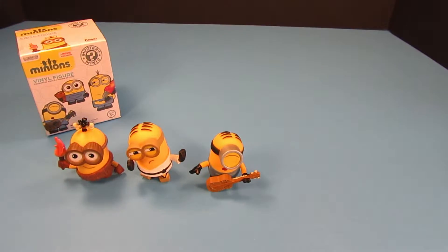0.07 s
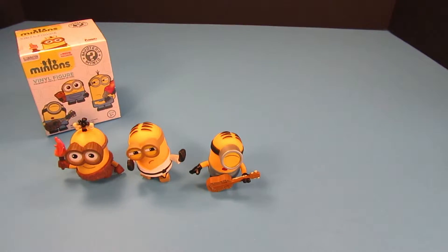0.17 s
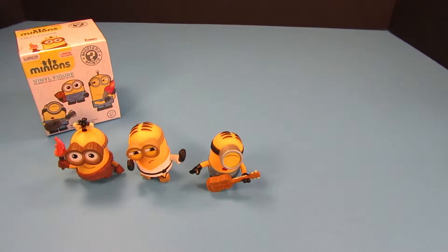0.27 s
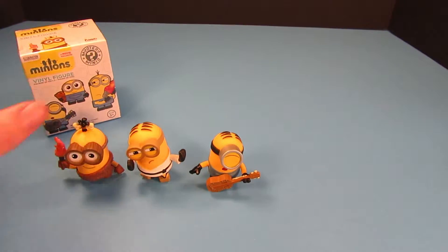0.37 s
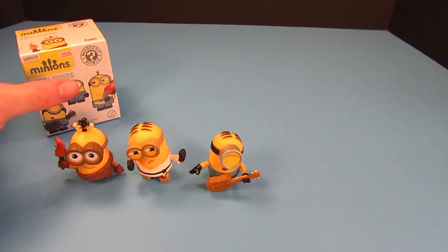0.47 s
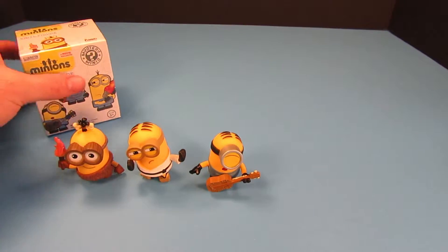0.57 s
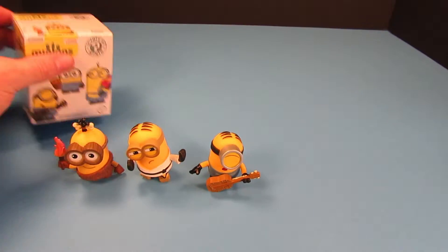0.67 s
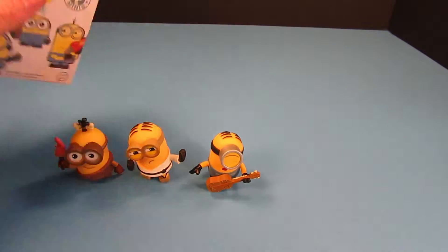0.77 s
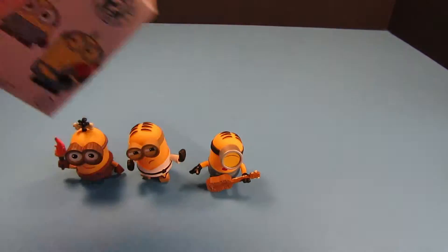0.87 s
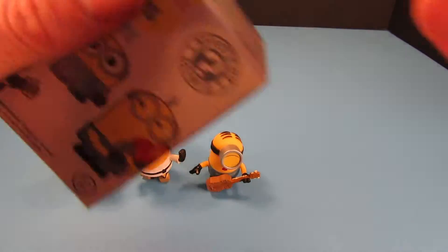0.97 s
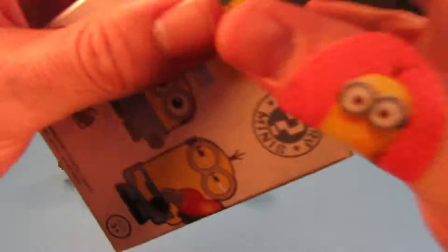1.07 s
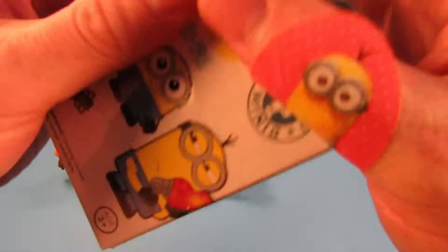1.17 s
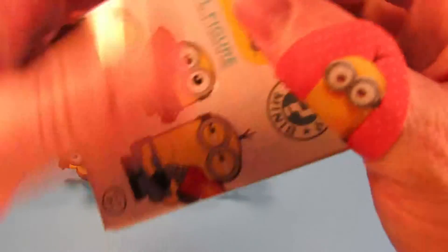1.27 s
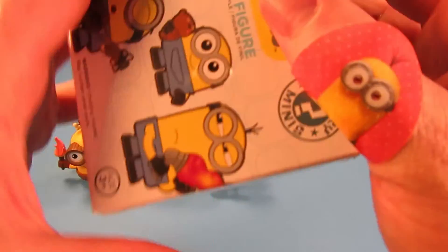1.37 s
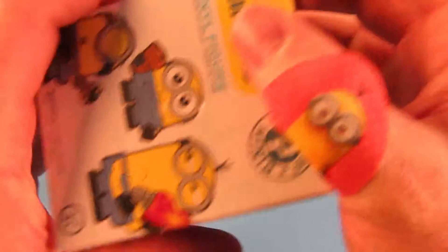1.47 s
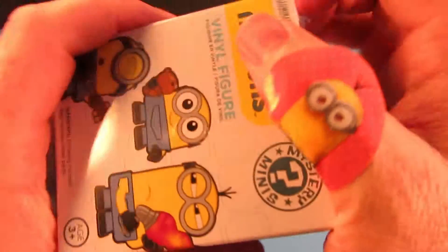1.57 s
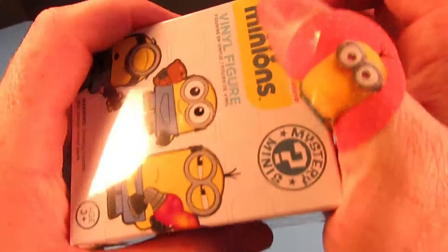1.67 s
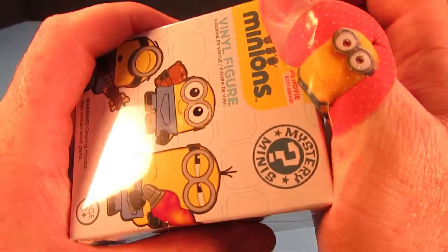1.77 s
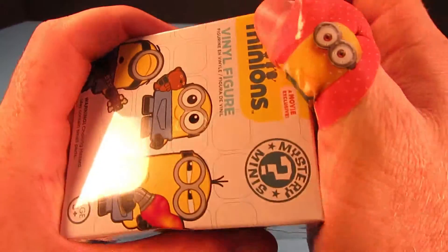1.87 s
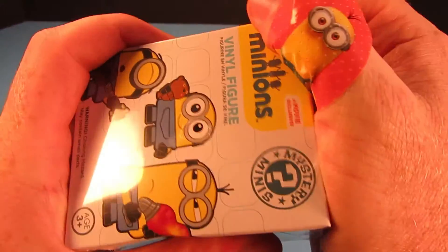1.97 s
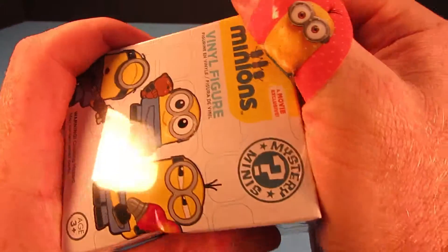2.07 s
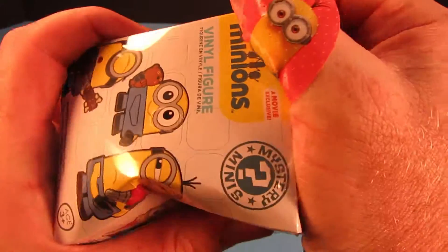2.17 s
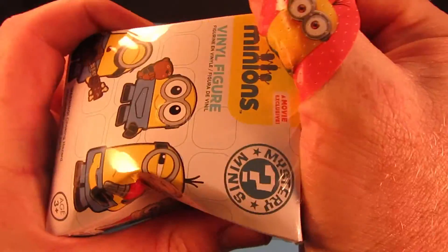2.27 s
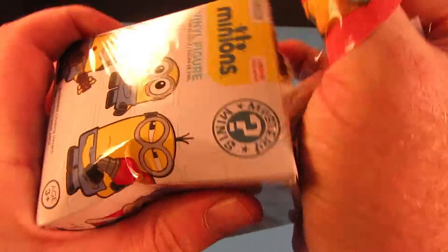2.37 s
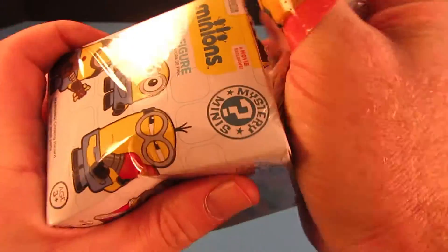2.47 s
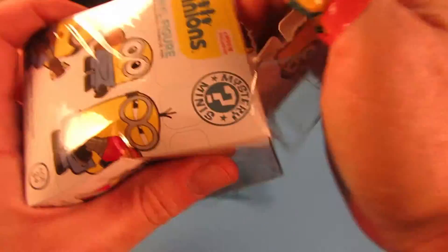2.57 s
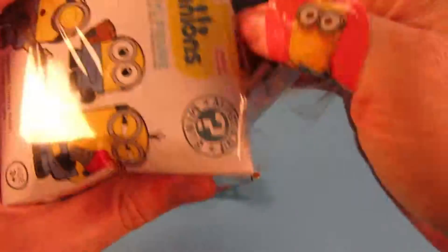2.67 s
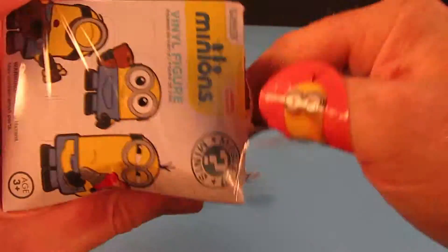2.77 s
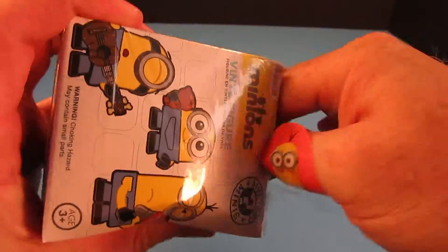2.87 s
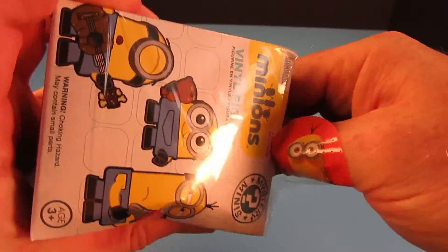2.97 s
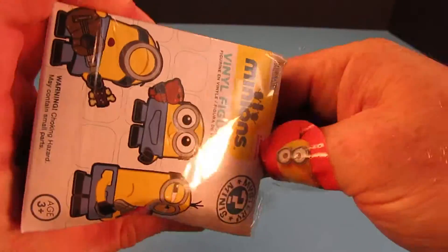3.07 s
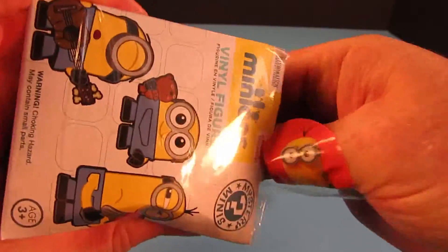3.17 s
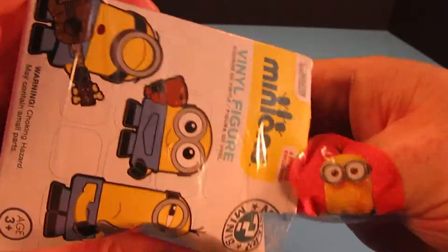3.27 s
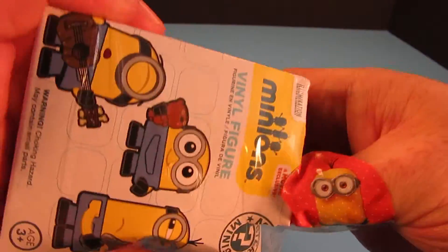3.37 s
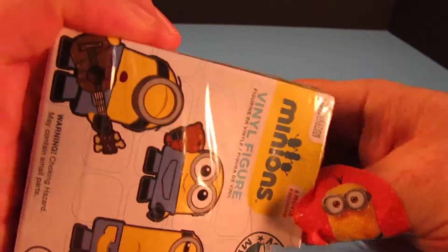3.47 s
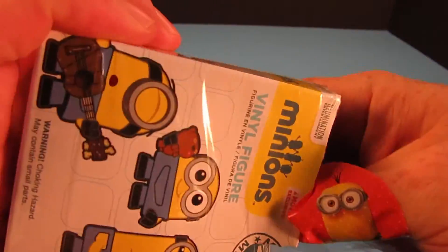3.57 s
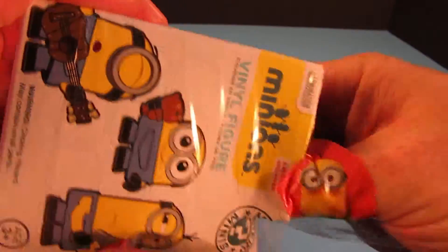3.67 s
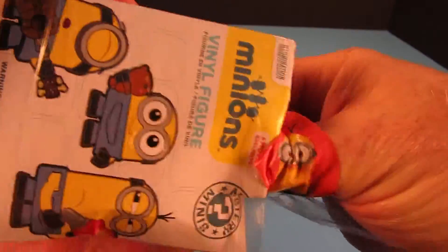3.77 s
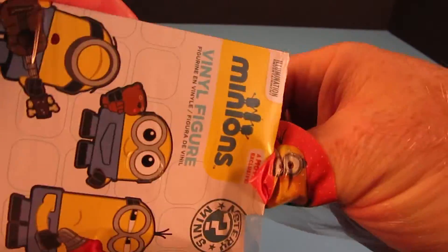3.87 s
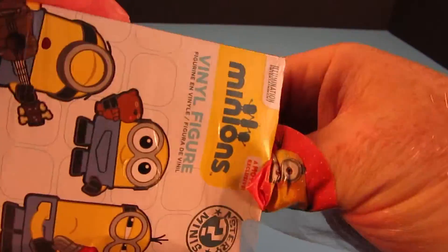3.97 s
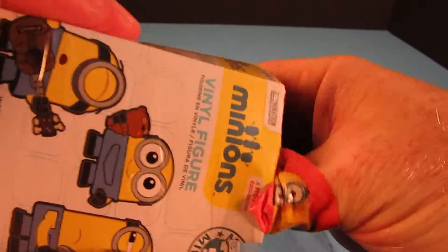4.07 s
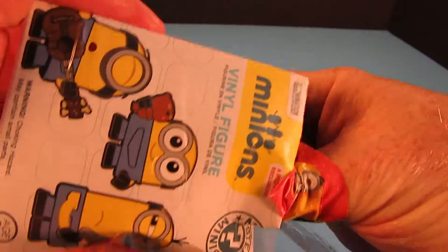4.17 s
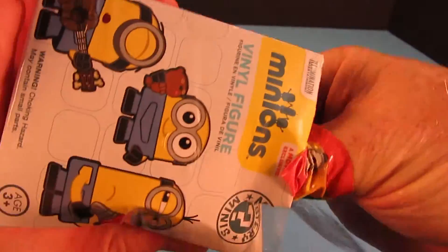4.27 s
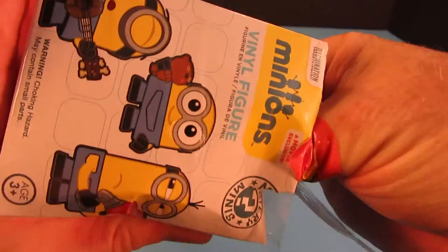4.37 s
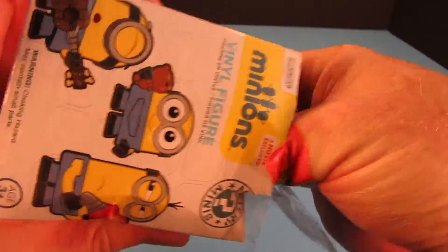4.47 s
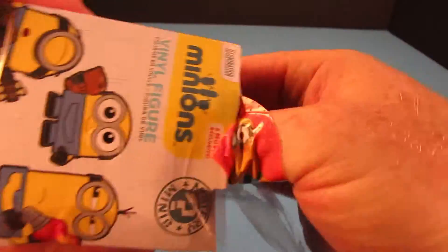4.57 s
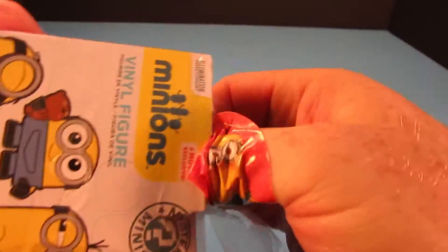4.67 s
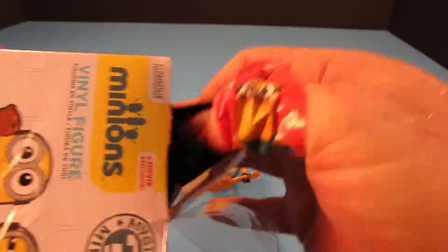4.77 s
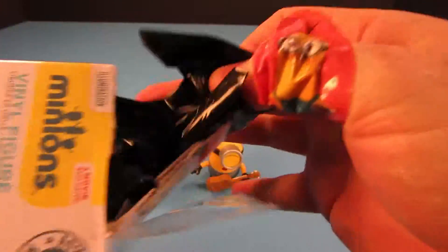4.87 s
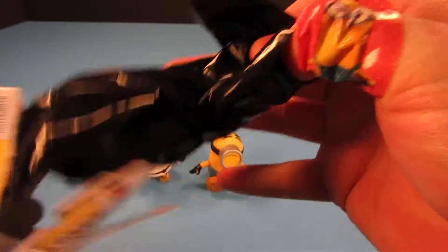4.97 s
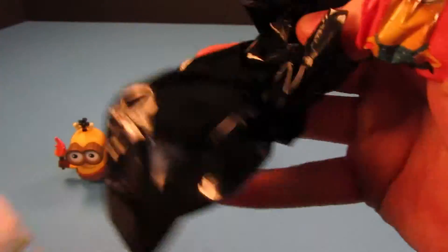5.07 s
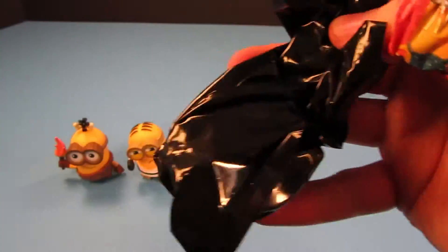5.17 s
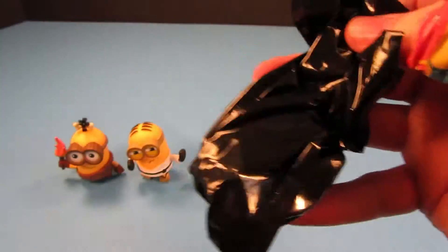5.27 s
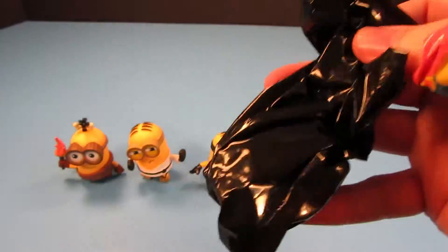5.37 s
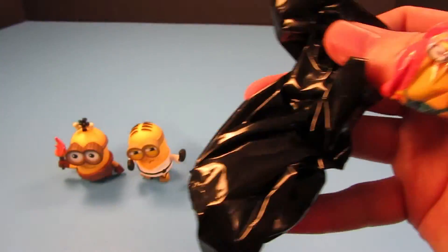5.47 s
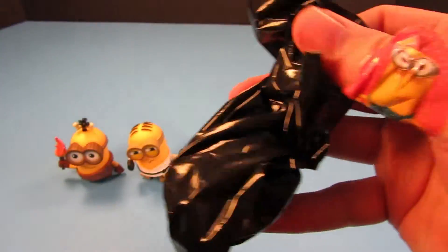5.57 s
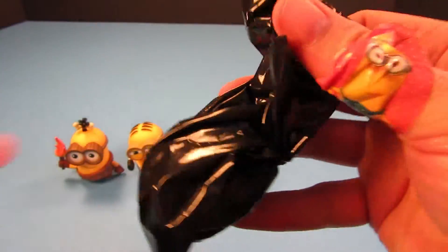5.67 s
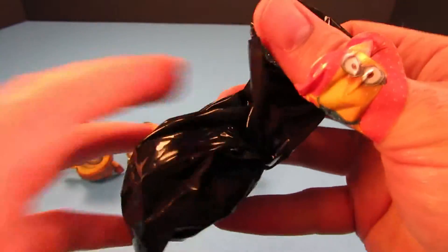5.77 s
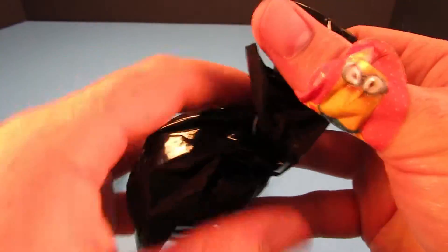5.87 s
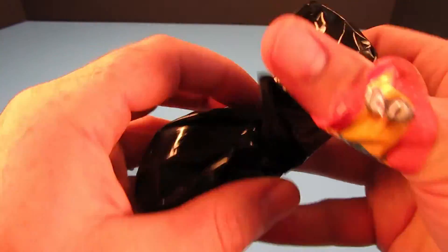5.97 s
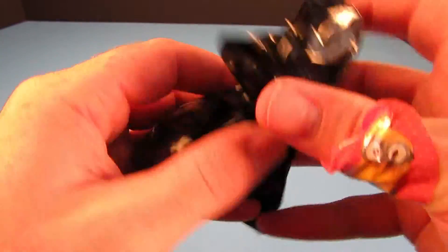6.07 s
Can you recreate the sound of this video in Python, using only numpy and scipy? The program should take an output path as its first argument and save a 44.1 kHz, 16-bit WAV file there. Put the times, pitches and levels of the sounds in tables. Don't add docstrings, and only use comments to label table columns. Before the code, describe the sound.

Faint hiss, then soft taps and a hollow knock from a light cardboard box. Film wrap is torn with bright cracks, a short creak and loud snaps, the box walls flexing under the fingers. A rush of foil rustle follows as a bag is drawn out, then sparse ticks, a clattering box landing, and a renewed burst of crisp crinkles. Very close, dry, with a short dull room tail.

```python
import sys
import numpy as np
from scipy import signal
from scipy.fft import rfft, irfft
from scipy.io import wavfile
from scipy.ndimage import uniform_filter1d

SR = 44100
rng = np.random.default_rng(int(sys.argv[2]) if len(sys.argv) > 2 else 0)


def generate_wav(signal):
    frames = np.transpose(np.atleast_2d(signal))
    scaled = np.clip(frames, -1, 1) * 32767
    pcm = np.round(scaled).astype(np.int16)
    wavfile.write(sys.argv[1], SR, pcm)


def magnitude_from_level(level_db):
    exponent = np.asarray(level_db, float) / 20
    return 10 ** exponent


N = 269892
TIME_S = np.arange(N) / SR
FACE_HZ = 710

# f/Hz, density/dB
HISS_SPECTRUM = [(25, -2.5), (230, -2.5), (710, -1), (1460, -10), (8600, -21), (9700, -17), (10800, -23.5),
                 (15000, -30)]
# t/s, level/dB
HISS_LEVEL = [
    (0, -53),
    (.9, -49),
    (1.4, -53.5),
    (2.1, -46.5),
    (2.8, -89.5),
    (6.12, -58),
]
# f/Hz, t60/s, level/dB
BOX_MODES = [(345, 0.013, 3.5), (470, 0.052, 3), (750, 0.046, 10), (874, 0.018, 7), (1080, 0.016, 14.5),
             (1700, 0.035, 3)]
# f/Hz, density/dB
FILM_SPECTRUM = [(700, -17.5), (1300, 11.5), (2600, 10.5), (5000, 3), (8000, -4), (11000, -7), (15000, -16)]
# t/s, effort/dB
EFFORT = [(.6, -108), (1.0, -46.5), (1.14, -64), (1.27, -47), (1.34, -76), (1.44, -63), (1.6, -62),
          (2.0, -55), (2.17, -59.5), (2.34, -50), (2.77, -56.5), (3.03, -53.5), (3.2, -65.5), (4.75, -41),
          (4.86, -34.5), (5.03, -31), (5.13, -54.5), (5.25, -60.5), (5.85, -68.5), (6.12, -38)]
# centre t/s, width/s, level/dB, box coupling/dB
RIPS = [(1.304, 0.044, -46.5, 15.5), (1.488, 0.038, -37, 14.5), (1.57, 0.045, -41, 6),
        (1.653, 0.061, -30.5, 11), (1.693, 0.022, -31.5, 13.5), (1.929, 0.039, -33, 11.5),
        (2.022, 0.081, -31.5, 8.5), (2.402, 0.021, -21, -18), (2.425, 0.063, -19.5, 7.5),
        (2.553, 0.022, -43.5, -16), (2.674, 0.027, -30.5, 3), (2.83, 0.047, -44, 4.5),
        (2.991, 0.093, -34, 7), (3.118, 0.047, -34, 8.5), (3.259, 0.15, -36, 6), (3.315, 0.058, -17.5, 1.5),
        (3.441, 0.1, -40.5, 10), (3.499, 0.042, -40, 3.5), (3.616, 0.039, -42, -9),
        (4.063, 0.033, -33.5, 5.5), (4.116, 0.058, -41, 3), (4.169, 0.026, -31, 11.5),
        (4.252, 0.073, -38, 4.5), (4.474, 0.02, -29.5, -6), (5.053, 0.051, -30.5, 7.5),
        (5.935, 0.068, -42.5, 10.5)]
# centre t/s, width/s, level/dB, box coupling/dB
DRAGS = [(0.926, 0.039, -43.5, 10.5), (1.036, 0.014, -34, 28.5), (1.189, 0.014, -41.5, -3),
         (1.223, 0.029, -56, 31), (1.887, 0.059, -33.5, 7.5), (2.221, 0.027, -24.5, 9),
         (2.257, 0.031, -23, -5), (2.586, 0.031, -43.5, 1), (2.712, 0.031, -38, 10), (2.908, 0.061, -30, 3),
         (3.682, 0.031, -34, 2.5), (3.759, 0.092, -40, 2), (3.835, 0.067, -33, -5),
         (3.965, 0.047, -31, -15), (4.323, 0.032, -31, 3.5), (4.441, 0.036, -27.5, -10),
         (4.624, 0.11, -40, -7), (4.686, 0.0046, -37, -6), (5.21, 0.014, -44, 3)]
# centre t/s, width/s, level/dB
HALTS = [(1.627, 0.018, -7.5), (1.873, 0.019, -6), (2.418, 0.008, -6), (3.196, 0.034, -3),
         (3.288, 0.028, -1.5), (3.364, 0.064, -5), (3.694, 0.015, -2), (3.866, 0.018, -4),
         (3.968, 0.011, -15), (4.017, 0.028, -6), (4.057, 0.012, -3), (4.342, 0.01, -8),
         (4.524, 0.022, -6.5), (4.726, 0.013, -23), (5.367, 0.032, -9), (5.985, 0.013, -11)]
# t/s, rms level/dB, t60/s
LANDING = [
    (5.7427, -27, 0.1),
    (5.7545, -17.5, 0.19),
]
# t/s, edge click level/dB, panel level/dB
SLIPS = [
    (2.0717, 7, 0.5),
    (2.0865, -26, -12),
    (2.1013, -32, -11),
    (2.113, -21, -7.5),
    (2.1259, -13, -6),
]
# t/s, peak level/dB, f/Hz
KNOCKS = [(0.7085, -24.5, 1400), (0.7174, -26, 620), (0.7245, -28, 310), (0.7945, -29.5, 557),
          (1.0335, -4.5, 835), (1.6395, -28, 1020), (1.6808, -15.5, 235), (1.9182, -20, 1080),
          (1.9401, -26.5, 540), (2.3008, -25.5, 594), (2.4128, -9.5, 362), (2.4268, -8, 990),
          (2.6934, -27, 470), (2.9901, -17.5, 540), (3.3112, -11, 1150), (3.5194, -2.8, 830),
          (3.5804, -20, 390), (3.8261, -21.5, 340), (3.9551, -15.5, 448), (4.8168, -8.5, 440),
          (4.857, -21, 255), (5.0128, -18, 1160)]
# t/s, peak level/dB
TAPS = [(0.7083, -21), (0.8031, -25), (1.111, -27.5), (1.1861, -22), (1.2318, -22), (1.476, -22),
        (1.5011, -18.5), (1.7626, -27.5), (2.2108, -15), (2.2519, -11), (2.6777, -23.5), (2.9469, -19.5),
        (3.2906, -3.5), (3.3264, -8), (3.3677, -10), (3.4329, -28.5), (3.7568, -21.5), (4.0635, -26),
        (4.1653, -20.5), (4.2745, -7.5), (4.2935, -24), (4.4768, -22), (5.052, -31), (5.0629, -37),
        (5.085, -33), (5.7612, -7), (6.087, -24)]
# t/s, peak level/dB, f/Hz, t60/s
THUDS = [(0.712, -26.5, 112, 0.24), (0.919, -30, 120, 0.016), (1.0316, -9, 488, 0.032),
         (3.522, -12.5, 404, 0.0067), (4.164, -24.5, 184, 0.02), (4.2759, -9, 333, 0.029),
         (4.817, -14, 299, 0.029), (1.6693, -13.5, 238, 0.067), (1.679, -18.5, 1834, 0.06)]
# t/s, peak level/dB, f/Hz
FLEXES = [(0.8816, -37, 597), (0.745, -34.5, 700), (1.054, -23, 467), (1.2177, -41, 800), (1.048, -30, 900),
          (1.451, -33.5, 730), (1.4851, -27, 664), (1.6056, -36, 304), (1.6097, -35, 710),
          (1.6518, -19.5, 710), (1.8678, -31, 1060), (1.8909, -30, 710), (1.9183, -26.5, 270),
          (1.946, -28.5, 266), (1.9461, -27, 710), (2.0465, -28, 187), (2.2113, -26, 300),
          (2.2531, -32, 308), (2.4456, -18, 308), (2.4487, -34, 286), (2.8757, -33, 450),
          (2.9074, -26, 570), (3.0088, -29, 710), (3.3909, -27.5, 425), (4.298, -27, 420),
          (3.5205, -13, 1230), (3.5205, -7.5, 374), (3.8152, -30, 830), (4.092, -34, 710),
          (4.1122, -38, 403), (4.294, -23.5, 1300), (4.274, -15.5, 1020), (4.63, -29, 756),
          (4.6503, -33, 700), (4.6536, -43, 524), (4.678, -27, 750), (4.7006, -29, 1070),
          (4.7354, -30, 740), (4.7968, -26, 590), (4.8446, -27, 460), (4.8741, -28, 750),
          (4.8865, -25.5, 744), (4.9126, -27.5, 730), (4.9267, -38, 750), (4.861, -21.5, 775),
          (4.9676, -29, 780), (5.0408, -25, 700), (5.051, -9.5, 750), (5.0629, -23, 750),
          (5.0854, -21.5, 790), (5.1245, -29, 720), (5.8741, -36, 360)]
# t/s, peak level/dB, f/Hz
NUDGES = [(0.9929, -34, 580), (1.0056, -36, 646), (1.941, -27, 640), (3.5683, -35, 480), (3.6839, -43, 710),
          (3.7471, -47, 680), (3.9243, -36, 1070), (4.5827, -36, 750), (4.6014, -39, 680)]
# t/s, peak level/dB, f/Hz
FACETS = [(0.9644, -33, 2600), (1.218, -31, 1343), (1.2952, -20, 4200), (1.6474, -25, 3220),
          (1.7005, -26, 1900), (1.8956, -32, 1290), (2.0125, -22.5, 2340), (2.0137, -26, 3230),
          (3.0085, -28, 2780), (2.1138, -26, 3240), (2.2241, -28, 2610), (0.69, -40, 3200),
          (2.2519, -11.5, 2556), (2.3001, -21, 1380), (2.4231, -12, 1450), (2.4258, -18, 3410),
          (2.9787, -23.5, 3060), (3.3109, -12, 3800), (3.3161, -22, 4700), (3.325, -9, 1980),
          (3.333, -13, 1280), (3.4462, -22.5, 1970), (3.8474, -24, 3150), (4.1883, -29, 1310),
          (4.2421, -29, 1800), (4.2449, -23.5, 4220), (4.3191, -22, 4260), (4.4272, -31, 3150),
          (4.4339, -27, 2220), (4.4428, -22, 2830), (4.4676, -20.5, 2020), (4.6129, -28, 2010),
          (4.6205, -25, 1980), (4.6521, -26, 2200), (4.6717, -29, 2270), (4.7069, -24.5, 3210),
          (4.7523, -27, 2030), (4.7672, -23.5, 3260), (3.8135, -31, 2210), (4.83, -29, 2510),
          (4.8307, -12, 4270), (4.8556, -22, 1490), (4.901, -24, 4460), (4.9246, -31, 2240),
          (4.9409, -28, 2460), (4.9516, -22, 4470), (4.9775, -20, 4310), (4.9884, -14, 4690),
          (5.0162, -19, 3600), (5.041, -14, 3880), (5.0638, -22, 4260), (5.0654, -28, 1580),
          (5.0913, -24, 4810), (5.7455, -26.5, 2380), (5.7852, -25, 1303), (6.0867, -18.5, 2340)]
# t/s, peak level/dB, centre f/Hz
CRINKLES = [(1.8947, -26, 6800), (2.4023, -4, 6160), (2.9908, -28, 6700), (3.2634, -26.5, 8300),
            (3.2937, -23, 5500), (3.3482, -26, 6140), (3.4287, -25, 5480), (3.4965, -24, 7240),
            (4.056, -29, 6960), (4.1839, -27, 5700), (4.4275, -22, 5870), (4.4429, -18.5, 6560),
            (4.5322, -25.5, 5470), (4.7066, -25, 8100), (4.8545, -26, 8840), (4.9354, -27, 7220),
            (4.9398, -18, 5620), (4.9775, -26, 6080), (5.0096, -24.5, 5730), (5.0142, -20, 9900),
            (5.0329, -20, 7300), (5.0404, -20.5, 5930), (5.0638, -18, 6060), (5.7587, -22, 6920),
            (6.0778, -32, 6660), (6.1161, -9, 8460)]
# t/s, peak level/dB, centre f/Hz
WRINKLES = [(2.4256, -9.5, 3540), (2.6696, -41, 3540), (2.9908, -26, 4600), (3.0968, -30, 4410),
            (3.2751, -30, 3810), (3.3197, -19, 4530), (3.7789, -28, 9820), (4.4157, -31, 5680),
            (4.6773, -26, 5280), (4.8548, -26, 4300), (4.9662, -17, 3940), (5.0095, -23, 4060),
            (5.0592, -24, 3970), (6.0669, -30, 4160), (3.7115, -33, 3130), (3.7475, -34, 3020),
            (3.832, -28, 4250), (3.986, -32, 6160), (5.197, -33, 2600), (4.366, -33, 6000)]
# t/s, peak level/dB
POPS = [(1.3, -5), (1.26, -23), (1.432, -40), (5.442, -39), (2.2498, -4), (3.3256, -2), (2.4125, 5.5),
        (4.8153, -25)]
# t/s, peak level/dB, ring f/Hz
FOLDS = [(0.7083, -25.5, 4150), (0.968, -25, 1830), (1.031, -8, 4800), (1.035, -14, 2000),
         (1.0785, -20, 2620), (1.218, -29.5, 2650), (1.66, -28, 3260), (1.678, -12, 2000),
         (2.2108, -12, 2800), (2.2535, -6, 2705), (2.4283, -10, 2530), (2.6203, -22.5, 1760),
         (2.9071, -13, 3400), (3.432, -18.5, 2340), (3.5194, -11.5, 1590), (3.5672, -21, 4630),
         (4.4273, -18, 2130), (4.4435, -19, 2120), (4.627, -20, 3120), (4.635, -19.5, 1980),
         (4.712, -17.5, 2480)]
# t/s, peak level/dB, ring f/Hz
CREASES = [(1.183, -27, 1830), (1.2302, -23.5, 1790), (1.89, -18, 10400), (2.0123, -22, 2210),
           (2.2991, -22, 1700), (2.446, -10, 2300), (2.5838, -22, 2020), (2.9443, -15.5, 5370),
           (3.1542, -26, 9680), (3.3254, -0.5, 5800), (3.631, -25.5, 5500), (3.684, -23, 2440),
           (3.7328, -34, 3180), (3.7575, -10.5, 1870), (4.113, -18, 3280), (4.1636, -15, 4380),
           (4.3862, -22.5, 8200), (4.5406, -22.5, 9400), (4.6023, -20.5, 7900), (4.8375, -12, 5260),
           (4.8577, -11, 9000), (4.9242, -15, 4930), (4.9559, -10, 4600), (4.9888, -14, 4990),
           (5.0758, -13.5, 7100)]
# t/s, peak level/dB, ring f/Hz
CRACKS = [(1.2951, -7.5, 9300), (1.9182, -13, 3140), (1.9342, -9, 7160), (2.2513, 1.5, 7940),
          (2.369, -27, 3450), (2.3996, 0.5, 4690), (2.4129, 5, 6000), (2.6759, -16, 5650),
          (2.8158, -23, 8450), (3.0384, -17.5, 5000), (3.0461, -8.5, 7810), (3.1014, -19, 4640),
          (3.3815, -19.5, 7750), (3.4453, -13, 1930), (3.4776, -21, 3740), (3.9543, -14.5, 4940),
          (4.0462, -19.5, 6100), (4.0627, -8.5, 3700), (4.1547, -20, 4030), (4.8158, -2.5, 2460),
          (4.8702, -12, 3250), (5.0512, -3, 3100), (5.1124, -16, 5040), (5.1747, -19, 8700),
          (5.311, -14, 3300), (5.8571, -20.5, 4860), (5.9632, -19.5, 5440), (6.0873, -9.5, 7560),
          (6.1106, -8.5, 6600), (6.1196, -3.5, 4840)]
# t/s, peak level/dB, ring f/Hz
DENTS = [(5.1232, -21, 7030), (5.148, -31, 8000), (5.1575, -21, 3900), (5.1839, -19, 5950),
         (5.211, -29, 5700), (5.219, -28, 3960), (5.2957, -27.5, 3900), (5.317, -28, 2560),
         (5.3882, -19.5, 4810), (5.4836, -32.5, 2580), (5.53, -29, 3020), (5.601, -37, 3020),
         (5.82, -22.5, 6730), (5.91, -21, 3470), (5.9249, -16.5, 6230), (5.9353, -9.5, 6140),
         (5.95, -10.5, 5900), (5.9571, -20, 5130), (6.011, -18, 4500), (6.0302, -22.5, 3030),
         (6.0403, -23, 5250), (6.0586, -19, 2830)]
# t/s, peak level/dB, ring f/Hz
TICKS = [(0.739, -20.5, 2950), (1.447, -22, 3200), (1.5518, -17, 3130), (1.699, -10, 5400),
         (2.316, -15, 3120), (3.2964, -16, 4540), (3.493, -18, 3010), (3.5438, -34, 4760),
         (4.8042, -1, 4960), (4.807, -5, 4530), (5.4474, -23, 5960), (2.8254, -15, 4000),
         (3.189, -34, 6950), (3.644, -21, 3780), (3.9122, -13.5, 4970), (4.517, -14, 3320),
         (5.466, -25, 4500), (5.671, -30, 3360)]


def unit(x):
    return x / np.sqrt(np.mean(x ** 2) + 1e-18)


def band(x, lo_hz, hi_hz, order=2):
    sos = signal.butter(order, [lo_hz, min(hi_hz, .45 * SR)], "band", fs=SR, output="sos")
    return signal.sosfilt(sos, x)


def colour(x, points):
    hz, db = np.transpose(points)
    f_hz = np.fft.rfftfreq(len(x), 1 / SR) + 1
    return irfft(rfft(x) * magnitude_from_level(np.interp(np.log(f_hz), np.log(hz), db)), len(x))


def fade(t_s, t60_s):
    return np.exp(-np.log(1000) * t_s / max(t60_s, .001))


def sine(hz, t_s):
    return np.sin(2 * np.pi * hz * t_s)


def add(out, at_s, x, db):
    top = np.argmax(np.abs(x))
    i = int(at_s * SR) - top
    x = x[:N - i]
    out[i:i + len(x)] += x * magnitude_from_level(db) / np.abs(x[top])


def flicker(rate_hz):
    hold = int(SR / rate_hz)
    levels = rng.standard_normal(N // hold + 1)
    return uniform_filter1d(np.repeat(levels, hold), hold)[:N]


def crackle(rate_hz, spread_db, smear_s):
    hits = rng.random(N) < rate_hz / SR
    clicks = hits * magnitude_from_level(spread_db * np.minimum(rng.exponential(size=N), 2.8))
    pole = np.exp(-1 / (max(smear_s, 1e-4) * SR))
    burst = np.sqrt(signal.lfilter([1], [1, -pole], clicks ** 2))
    return unit(burst * rng.standard_normal(N))


def hiss():
    level_db = np.interp(TIME_S, *np.transpose(HISS_LEVEL))
    return unit(colour(rng.standard_normal(N), HISS_SPECTRUM)) * magnitude_from_level(level_db)


def room(x):
    t60_s, tail_db = 0.14, -23
    t = np.arange(int(.25 * SR)) / SR
    tail = band(rng.standard_normal(len(t)), 94, 2700, order=1) * fade(t, t60_s) * (t > .004)
    tail *= magnitude_from_level(tail_db) / np.sqrt(np.sum(tail ** 2))
    tail[0] += 1
    return signal.fftconvolve(x, tail)[:N]


def box_hum(force):
    t = np.arange(3000) / SR
    ring = sum(magnitude_from_level(db) * sine(hz, t) * fade(t, 0.36 * t60_s) for hz, t60_s, db in BOX_MODES)
    return unit(band(signal.fftconvolve(force, ring)[:N], 255, 4700))


def effort_gains():
    box_gone_s, box_gone_db = 5.15, -5.5
    rip_treble_db, drag_treble_db = -5, -12
    effort_db = np.interp(TIME_S, *np.transpose(EFFORT), left=-99)
    mid = magnitude_from_level(effort_db)
    low = magnitude_from_level(-46 + 0.69 * (effort_db + 46.5) + box_gone_db * (TIME_S > box_gone_s))
    top = magnitude_from_level(-53 + 1.1 * (effort_db + 48))
    surges = [(*r, rip_treble_db) for r in RIPS] + [(*d, drag_treble_db) for d in DRAGS]
    for centre_s, width_s, db, low_db, treble_db in surges:
        late = TIME_S - centre_s + 0.043 * width_s
        side_s = np.where(late < 0, 0.45, 0.5) * width_s
        surge = np.exp(-(late / side_s) ** 2) * magnitude_from_level(db - 5.5)
        mid += surge
        low += surge * magnitude_from_level(low_db - 6.0)
        top += surge * magnitude_from_level(treble_db)
    return low, mid, top


def rustle():
    low_gain, mid_gain, top_gain = effort_gains()
    broad = crackle(700, 5.9, 0.00062) + .5 * crackle(3200, 1.6, 0.00087)
    facets = sum(band(crackle(600, 8.7, 0.0026), hz, 1.73 * hz) for hz in (1160, 2220, 4800, 9000))
    film = colour(broad + 0.83 * facets, FILM_SPECTRUM)
    mid = unit(band(film, 1300, 7000))
    top = -unit(band(film, 7000, 16000))
    low = box_hum(.5 * broad + crackle(400, 3.1, 0.001))
    rumble = magnitude_from_level(-43.5) * np.sqrt(low_gain) * unit(band(crackle(90, 1.4, 0.0022), 64, 200))
    halt_db = sum(db * np.exp(-((TIME_S - s) / (0.41 * width_s)) ** 2) for s, width_s, db in HALTS)
    film_part = magnitude_from_level(halt_db) * (mid_gain * mid + top_gain * top)
    box_part = magnitude_from_level(1.2 * halt_db) * low_gain * low
    return magnitude_from_level(3.23 * flicker(77)) * (film_part + box_part + rumble)


def landing():
    shake = np.zeros(N)
    for s, db, t60_s in LANDING:
        late = TIME_S - s
        shake += magnitude_from_level(db) * np.clip(late / 0.002, 0, 1) * fade(np.maximum(late, 0), t60_s)
    rattle = unit(band(crackle(4800, 2.2, 0.0011), 730, 4000, order=1))
    body = box_hum(rng.standard_normal(N))
    return band(shake * (body + magnitude_from_level(-7) * rattle), 175, 12000)


def creak():
    edge_hz, edge_t60_s = 2926, 0.006
    panel_hz, panel_t60_s, panel_rise_s = 720, 0.0087, 0.0014
    out, t = np.zeros(N), np.arange(2000) / SR
    chance = rng.standard_normal((len(SLIPS), len(t)))
    for (s, click_db, panel_db), noise in zip(SLIPS, chance):
        edge = sine(edge_hz, t) + 0.12 * noise + 1.02 * band(noise, 740, 4300)
        edge *= fade(t, edge_t60_s) * np.minimum(t / 0.00017, 1)
        panel = -1.24 * sine(panel_hz, t) * fade(t, panel_t60_s) * (t / panel_rise_s)
        panel += 1.1 * band(noise, 270, 1560) * fade(t, 0.027)
        i = int(s * SR)
        out[i:i + len(t)] += magnitude_from_level(click_db) * edge + magnitude_from_level(panel_db) * panel
    return out


def thuds():
    out, t = np.zeros(N), np.arange(4000) / SR
    for s, db, hz, t60_s in THUDS:
        panel = sine(hz, t) + .5 * sine(1.59 * hz, t) * fade(t, t60_s)
        add(out, s, band(panel * fade(t, t60_s), max(130, .5 * hz), 4000), db)
    return out


def knocks():
    panel_t60_s, rise_cycles = 0.017, 0.57
    out, t = np.zeros(N), np.arange(4000) / SR
    blows = KNOCKS + [(s, db, FACE_HZ) for s, db in TAPS]
    chance = rng.standard_normal((len(blows), len(BOX_MODES), 2))
    for (s, db, hz), mix in zip(blows, chance):
        t60_s = panel_t60_s * (FACE_HZ / hz) ** 0.2
        ring = sine(hz, t) * np.tanh(t * hz / rise_cycles) * fade(t, t60_s)
        for (mode_hz, mode_t60_s, mode_db), (size, detune) in zip(BOX_MODES, mix):
            mode = sine(mode_hz * (1 + 0.087 * detune), t) * fade(t, 0.27 * mode_t60_s)
            mode *= np.tanh(t * mode_hz / rise_cycles)
            ring += 0.18 * magnitude_from_level(mode_db) * np.tanh(size) * mode
        ring[0] += 1.5
        push = np.hanning(max(int(.28 * SR / hz), 3))
        add(out, s, band(np.convolve(ring, push)[:len(t)], 190, 2800), db)
    return out


def pops():
    pop_hz, fizz_t60_s = 6580, 0.002
    out, t = np.zeros(N), np.arange(1800) / SR
    for s, db in POPS:
        fizz = 0.24 * rng.standard_normal(len(t)) * fade(t, fizz_t60_s)
        burst = sine(pop_hz, t) * fade(t, 2.2 / pop_hz) + fizz
        add(out, s, band(burst, 1400, 13500, order=1), db)
    return out


def gives():
    flex, facet, crinkle = (1.2, .2, .6), (3.1, .8, 0.76), (4.6, 1, 0.72)
    kinds = ((FLEXES, flex), (FACETS, facet), (CRINKLES, crinkle), (NUDGES, flex), (WRINKLES, crinkle))
    rows = [(*row, *kind) for table, kind in kinds for row in table]
    out, t = np.zeros(N), np.arange(1800) / SR
    chance = rng.standard_normal((len(rows), len(t)))
    for (s, db, hz, cycles, noisy, octaves), noise in zip(rows, chance):
        swing = t * max(hz, FACE_HZ) / cycles
        half = 2 ** (octaves / 2)
        rough = unit(band(noise, hz / half, hz * half))
        add(out, s, swing * np.exp(-swing) * (sine(hz, t) + noisy * rough), db)
    return out


def snaps():
    # t60/s, treble/dB, facet ring/cycles, broad spray share
    fold, crease, crack = (0.1154, -29, 27, 0.6), (0.04, -6.5, 6, 0.4), (0.014, 9.1, 6.6, 0.51)
    dent, tick = (0.06, -19, 9.5, 0.32), (0.055, 3, 4.5, 0.78)
    kinds = ((FOLDS, fold), (CREASES, crease), (CRACKS, crack), (DENTS, dent))
    rows = [(*row, *kind) for table, kind in kinds for row in table]
    rows += [(s + 0.0011, db - 12.0, hz, *tick) for s, db, hz in TICKS]
    out, t = np.zeros(N), np.arange(2000) / SR
    chance = rng.standard_normal((len(rows), 2, len(t)))
    late = np.maximum(t - .002, 0)
    onset = np.exp(np.minimum(t - .002, 0) / 0.00037)
    for (s, db, hz, t60_s, treble_db, cycles, broad), (noise, size) in zip(rows, chance):
        small_clicks = 0.046 * fade(late, 0.031) * magnitude_from_level(2.1 * size)
        spray = noise * onset * (fade(late, 0.19 * t60_s) + small_clicks)
        facet = sine(hz, late) * fade(late, cycles / hz)
        facet += 0.78 * band(spray, hz / 1.25, hz * 0.99, order=1)
        add(out, s, facet + broad * band(spray, 1100, 6300), db)
        add(out, s, -band(spray, 6500, 11000), db + treble_db - 15.0)
    return out


def scene():
    hands = band(snaps(), 300, SR) + knocks() + thuds() + rustle()
    hands += creak() + landing()
    hands += band(pops() + gives(), 99, SR)
    return (room(hands) + hiss())[None]


def top_cut(x):
    return signal.sosfilt(signal.butter(12, 16330, fs=SR, output="sos"), x)


def record(dry):
    low_pass = signal.ellip(12, .3, 55, 14980, fs=SR, output="sos")
    mix = signal.sosfilt(low_pass, np.clip(dry, -.85, .85))
    return top_cut(mix)


dry = scene()
out = record(dry)
generate_wav(out)
```